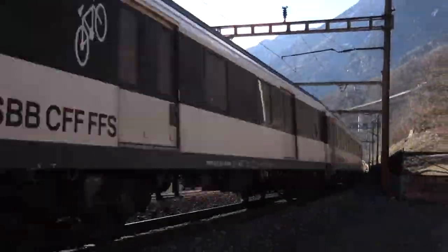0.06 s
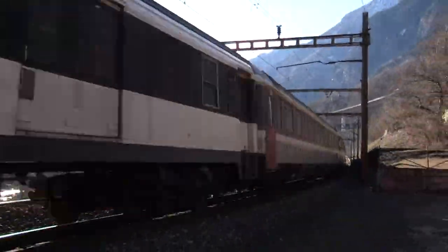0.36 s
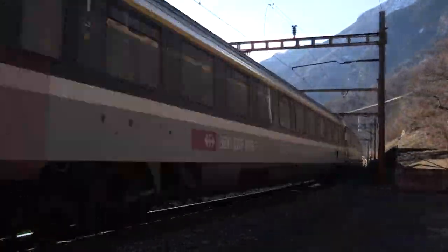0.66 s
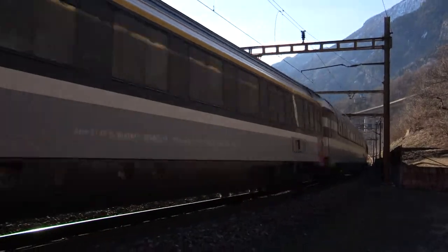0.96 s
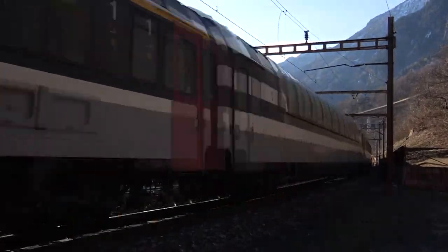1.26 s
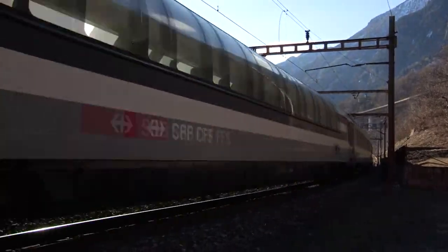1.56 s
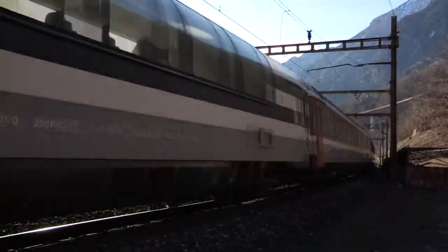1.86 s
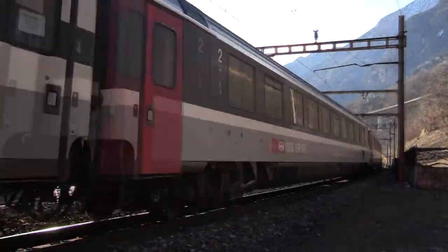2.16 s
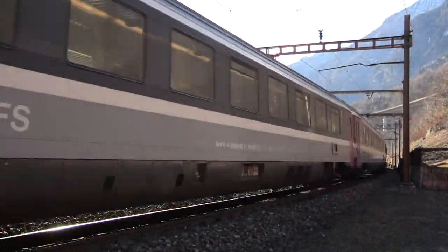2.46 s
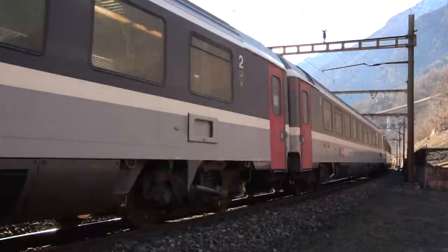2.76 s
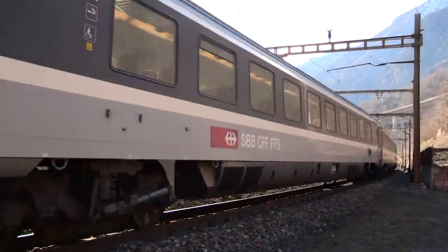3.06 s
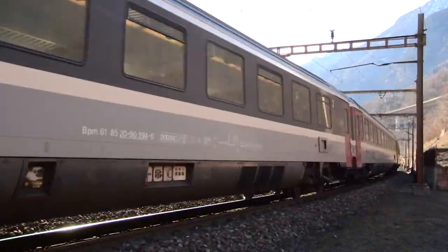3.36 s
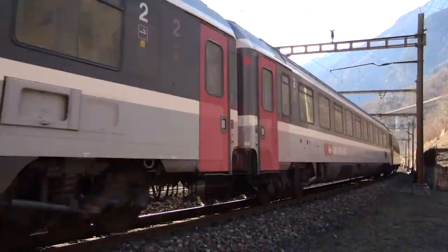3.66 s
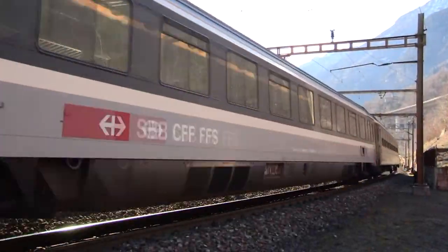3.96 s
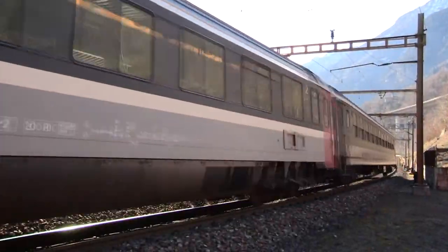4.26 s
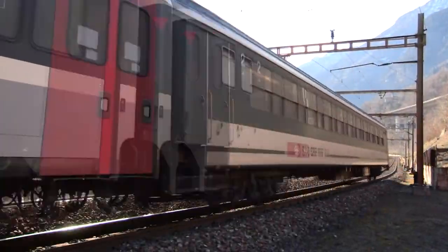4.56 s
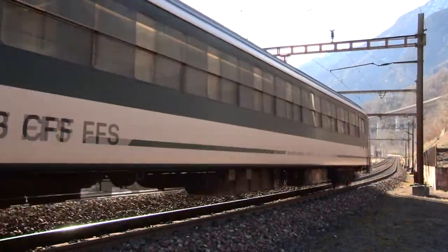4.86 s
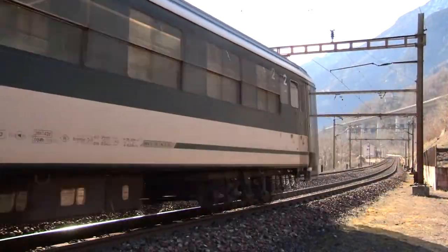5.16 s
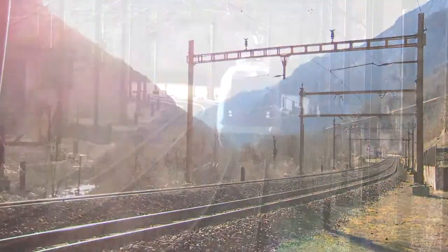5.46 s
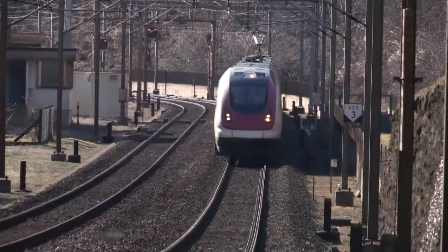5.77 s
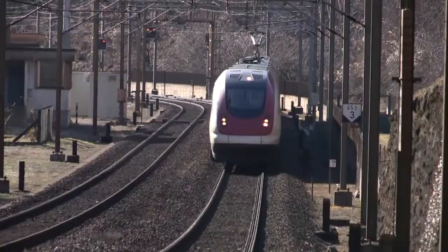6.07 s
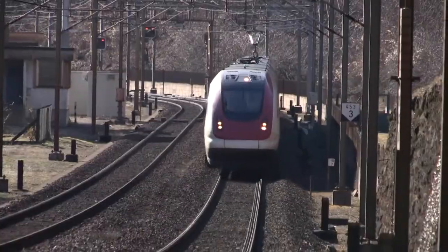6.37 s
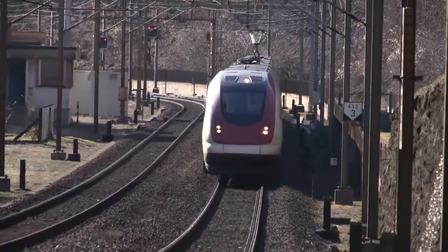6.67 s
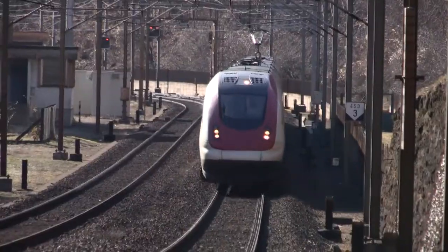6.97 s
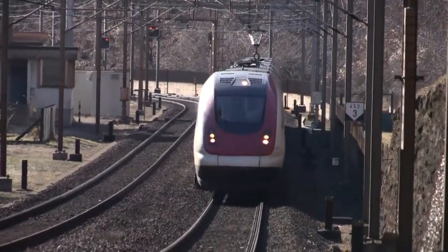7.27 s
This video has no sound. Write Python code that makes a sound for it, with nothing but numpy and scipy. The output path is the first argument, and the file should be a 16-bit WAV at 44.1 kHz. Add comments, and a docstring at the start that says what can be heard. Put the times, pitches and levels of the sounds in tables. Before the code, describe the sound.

An electric passenger train rushes past a few metres from the microphone, loud from the start and stronger on the left. It opens with a low gust and a gear whine that sinks and fades within half a second. Wheels roar by in surges about every 0.8 seconds, with rumbling air, gritty scrapes and brief high squeals gliding slightly down. Rapid metallic knocking comes from about 1.8 to 3 seconds and again from 3.4 to 3.8. A thin rail sizzle runs from 2.2 to 4.4 seconds. From 4.7 the last coach passes with a rough, ringing roar. At 5.5 seconds the sound cuts abruptly to a much quieter outdoor line, where a distant train makes a faint, smooth roar until the end, around 7.5 seconds. Small birds chirp thinly on the left until 6.5, and once more near 7.2. Four tiny dry ticks sound close by around 6 seconds.

```python
"""A gust and a roar of wheels: an electric passenger train rushes by a few metres from a stereo microphone.
A pair of bogies passes about every 0.8 s. Rough wheels shake sleepers and rails, flanges scrape,
wheel discs sing and glide down in pitch, and flat spots knock once a turn.
At 5.5 s comes an abrupt cut to the quiet line: another train far up the track, small birds
off to the left, and a few dry ticks close to the microphone."""
import sys
import numpy as np
from scipy import signal
from scipy.fft import rfft, irfft
from scipy.io import wavfile
from scipy.ndimage import uniform_filter1d

SR = 44100
rng = np.random.default_rng(int(sys.argv[2]) if len(sys.argv) > 2 else 0)


def dump(signal):
    """Clip the signal to [-1, 1] and save it as 16-bit WAV at the path in sys.argv[1]."""
    limited = np.clip(np.atleast_2d(signal).T, -1, 1)
    pcm = np.round(limited * 32767).astype(np.int16)
    wavfile.write(sys.argv[1], SR, pcm)


N = 322812
TIME = np.arange(N) / SR
CUT_S, SPEED_M_PER_S = 5.511, 33
DOPPLER, GLIDE_S = .07, .25  # a passing wheel's pitch swing each way [share], and its time scale

# how alike the microphone's two channels are: (frequency [Hz], coherence [0-1])
COHERENCE = [(25, .5), (60, .72), (130, .92), (300, .94), (1000, .88), (1500, .76), (2500, .5), (6000, .44),
             (9000, .28), (11500, .5), (15000, .2)]
# how far the left channel leads: (frequency [Hz], phase [rad])
LEFT_LEAD = [(100, 0), (200, .2), (500, .5), (800, .8), (3000, 1), (6000, 1.3), (7000, 1.7), (9000, 1),
             (10500, -.2), (15000, .4)]
# balance of the near track and of the distance: (frequency [Hz], left minus right [dB])
NEAR_BALANCE = [(25, 7.3), (60, 5.5), (130, 3.7), (260, 3.4), (550, 4.4), (1100, 6), (2200, 5.5),
                (8000, 4.5), (15000, 4.3)]
FAR_BALANCE = [(100, 2.2), (1000, 2.1), (8000, 2)]

# spectra of the slipstream and of the gust on the microphone: (frequency [Hz], relative level [dB])
AIR_COLOUR = [(20, -27.5), (50, -25), (85, -5), (130, 1), (170, 4), (260, -13)]
GUST_COLOUR = [(20, -16), (45, -12), (72, 3), (105, -4), (160, -23)]
# slipstream rumble at the trackside: (time [s], level [dB])
RUMBLE_LEVEL = [(0, -44), (.12, -44), (.25, -46), (.85, -52), (1.0, -48), (1.4, -53), (1.82, -49),
                (2.08, -38.5), (2.38, -45.5), (2.8, -54.5), (3.5, -55), (3.85, -60), (4.3, -58.5),
                (5.5, -63)]
# bogies, from the locomotive's last one on:
# (time abreast [s], sleepers [dB], rails [dB], wheels [dB], contact hiss [dB], fizz over hiss [dB])
BOGIE_PASSES = [(.02, -25, -14, -19, -29.5, 1), (.17, -48.5, -22.5, -27, -36.5, 4.5),
                (.57, -47, -38, -28, -33.5, -0.5), (.78, -32, -24.5, -28.5, -36, -2.5),
                (1.35, -27, -22, -25.5, -33, 1.5), (1.5, -33.5, -18.5, -26, -35.5, 1.5),
                (2.08, -34.5, -31, -27.5, -34, 3.5), (2.32, -36.5, -25, -25, -35, 5),
                (2.88, -45.5, -30, -28.5, -41.5, 1), (3.11, -39.5, -25.5, -25.5, -30, 3.5),
                (3.78, -36, -28.5, -26, -32.5, 3.5), (3.96, -35.5, -26.5, -29, -37.5, 3.5),
                (4.55, -39, -33, -28, -35.5, 2.5), (4.7, -37, -23, -26.5, -35, -1.5),
                (5.37, -41, -30.5, -29, -34.5, -10)]
# spectra of those five parts of the rolling noise: (frequency [Hz], relative level [dB])
SLEEPER_COLOUR = [(90, -44), (150, -25), (190, -7), (235, 1), (280, 0.5), (340, 2.5), (450, 2), (560, 0),
                  (700, -2.5), (1100, -31)]
RAIL_COLOUR = [(350, -46.5), (550, -12.5), (660, -6), (790, -3.5), (950, 0), (1250, 1.5), (1500, 0.5),
               (1800, -3.5), (2150, -5), (2600, -13), (4000, -36.5)]
WHEEL_COLOUR = [(1500, -44.5), (2250, -3), (2850, -0.5), (3250, -0.5), (3750, 1.5), (4100, 0.5),
                (4450, 0.5), (5000, -1.5), (5900, -2), (6500, -4.5), (7500, -9.5), (10000, -46.5)]
HISS_COLOUR = [(4500, -36.5), (6600, 3.5), (7100, 0.5), (7900, 3.5), (8500, 3), (9400, 2), (10000, -8.5),
               (12000, -37)]
FIZZ_COLOUR = [(8500, -26), (9900, -3), (11200, -1.5), (12000, -1), (13500, -2), (16000, -1.5)]
# gear whine of the receding locomotive: (time [s], level [dB])
GEAR_LEVEL = [(0, -5.5), (.04, -13.5), (.09, -21.5), (.18, -21.5), (.3, -30.5), (.4, -41), (.55, -60)]
# single modes of wheels and track: (time [s], half length [s], frequency [Hz], width [Hz], level [dB])
WHEEL_SQUEALS = [(.04, 0.035, 3070, 300, -21), (.5, 0.08, 4510, 109.7, -31), (.67, 0.075, 4320, 110, -31),
                 (.803, .017, 3750, 90, -28), (.882, 0.011, 3740, 70, -20), (1.26, 0.056, 3820, 110, -32),
                 (1.3, .02, 4600, 150, -27), (1.42, 0.08, 3684, 240, -23), (1.43, .04, 4550, 150, -30),
                 (1.58, 0.056, 4300, 110, -34), (2.02, 0.12, 9400, 330, -38),
                 (2.195, 0.03, 3660, 240, -27.5), (2.285, 0.027, 8840, 130, -28.5),
                 (2.32, 0.087, 5840, 170, -29), (2.34, .07, 13550, 400, -36),
                 (2.905, 0.021, 9400, 170, -25.5), (2.935, 0.041, 3620, 280, -30.5),
                 (3.14, .035, 13500, 200, -30.5), (3.235, 0.018, 11900, 150, -26),
                 (3.43, 0.15, 2350, 502, -37), (3.15, 0.094, 4300, 350, -30.5), (3.72, .04, 2890, 100, -32),
                 (3.97, 0.22, 3740, 200, -37), (3.74, 0.032, 5850, 170, -26.5),
                 (3.73, .022, 15400, 330, -30), (3.735, .02, 7480, 150, -31),
                 (4.31, 0.19, 2284, 300, -35.5), (4.55, 0.085, 9360, 260, -37),
                 (4.55, 0.083, 4400, 260, -36), (5.42, 0.065, 2696, 220, -31)]
TRACK_HUMS = [(.35, 0.21, 289, 35, -38), (.72, 0.23, 1624, 170, -25.5), (.88, 0.057, 687, 150, -25),
              (1.25, 0.15, 310, 45, -32.5), (1.66, 0.074, 301.5, 40, -33.5), (2.0, 0.11, 424, 45, -34),
              (2.15, 0.23, 1408, 110, -33.5), (2.92, 0.27, 1380, 110, -33), (2.33, 0.035, 540, 35, -32),
              (2.37, 0.081, 660, 70, -34), (2.955, 0.033, 658, 90, -28), (3.07, 0.11, 665, 70, -34),
              (4.68, 0.044, 1130, 550, -23.5), (5.35, 0.071, 1350, 420, -25)]
# flanges touching the rail: (start [s], length [s], level [dB])
FLANGE_SCRAPES = [(.04, .05, -29), (.145, .05, -28.5), (.33, 0.069, -32.5), (1.49, 0.11, -33),
                  (2.224, 0.22, -30), (2.78, .17, -28.5), (3.03, 0.14, -29), (3.658, .045, -31),
                  (3.7, .06, -30)]
# older cars with rough treads: (start [s], end [s], rails [dB], wheels [dB], fizz [dB])
ROUGH_PASSES = [(0.285, 0.918, -25, -30, -36), (4.697, 5.598, -26, -34, -36.5)]
# modes of their wheels: (frequency [Hz], width [Hz], level against those wheels [dB])
ROUGH_WHEEL_MODES = [(2370, 730, -4.5), (2864, 360, -8.5), (4250, 230, -19)]
# singing wheels: (time [s], half length [s], level [dB], emphasis before tuning [Hz], tuning [ratio])
SINGING_WHEELS = [(1.5, 0.11, -29, 7500, 0.84), (2.101, 0.044, -28.5, 6800, 1.04),
                  (2.286, .05, -23.5, 8480, .972), (2.392, 0.065, -36, 12000, 1.6),
                  (2.896, .055, -28.5, 9000, 0.9), (3.085, 0.049, -19.5, 9300, 0.99),
                  (3.185, .042, -23.5, 11000, .975), (3.735, .025, -29, 11500, 1.1),
                  (4.522, 0.067, -43, 8500, 0.99), (5.419, .09, -47, 8500, 1.002)]
# high modes of the wheel discs: (frequency before tuning [Hz], width [Hz], relative level [dB])
DISC_MODES = [(4380, 270, -6.5), (5940, 330, 8), (7530, 320, 5.5), (9110, 450, 7), (10760, 420, -0.5),
              (12050, 270, 3.5), (13700, 300, -1.5), (15250, 250, -4.5)]
# flat spots, about 84 ms a turn, and lighter blows: (time [s], thump [dB], clang [dB], crack [dB])
FLAT_SPOT_HITS = [(1.764, -32, -25, -34), (1.8485, -39, -19, -37), (1.931, -35, -16, -29),
                  (2.015, -33.5, -18, -33), (2.099, -28, -21.5, -30), (2.201, -33, -19, -26),
                  (2.282, -35, -20, -34), (2.372, -24, -27, -37), (2.449, -30.5, -22.5, -30),
                  (2.524, -35.5, -27, -30), (2.607, -43, -27, -35), (2.692, -28.5, -24.5, -28),
                  (2.728, -45, -27.5, -44), (2.7765, -23.5, -17.5, -30), (2.86, -28, -24, -27),
                  (2.933, -43, -27, -38), (2.949, -25, -24, -38), (3.414, -41.5, -25, -34),
                  (3.498, -31, -26, -29), (3.5045, -30, -35, -29.5), (3.5825, -23, -17.5, -26.5),
                  (3.666, -31.5, -22, -28), (3.677, -48, -30, -29), (3.751, -34, -40, -30)]
# ring of sleeper (thump), rail (clang), wheel (crack): (frequency [Hz], relative level [dB], t60 [s])
HIT_MODES = {"thump": [(366, -9.5, 0.052), (425, -4.5, 0.033), (650, 0.5, 0.027)],
             "clang": [(750, -4.5, .016), (937, 0, .019), (1050, 2.5, 0.021), (1320, -4, 0.029),
             (1480, -7.5, .014)], "crack": [(1860, -6, 0.022), (2253, 0, .022), (2850, -3.5, .014)]}
# how each of the three sets in: (delay [s], rise [s])
HIT_ONSETS = {"thump": (0.00295, 0.0022), "clang": (0.00032, 0.00095), "crack": (0, 0.00047)}
# the last coach's bogies: (time [s], half length [s], level [dB])
LAST_BOGIES = [(4.768, 0.18, -27.5), (5.328, 0.21, -27.5)]
# bell-like modes of their older wheels: (frequency [Hz], width [Hz], relative level [dB])
BELL_MODES = [(2270, 330, -4.5), (2556, 190, -1.5), (2930, 100, -0.5), (4170, 400, 0), (5280, 200, -8),
              (6400, 280, -5), (7750, 350, -11), (9250, 400, -9.5), (10800, 220, -16)]

# spectra on the quiet line, of far train, low hum and soft hiss: (frequency [Hz], relative level [dB])
FAR_TRAIN_COLOUR = [(25, -46), (60, -28), (95, -29), (122, -12), (160, -20), (250, -8.5), (500, -7.5),
                    (900, -3), (1750, -1), (3000, -9.5), (4800, -15), (6500, -20.5), (8500, -29),
                    (11000, -36), (15500, -41)]
FAR_HUM_COLOUR = [(85, -30), (110, -7), (132, 8), (170, -32)]
SOFT_HISS_COLOUR = [(1500, -18.5), (3500, -4), (6000, 0), (9000, -10), (12500, -12), (16000, -17)]
# birds beside the line: (time [s], note shape, level [dB])
BIRD_CALLS = [(5.525, "high", -60), (5.62, "flick", -55), (5.722, "high", -61), (5.824, "flick", -58),
              (5.888, "arch", -61), (6.018, "slur", -62), (6.12, "arch", -58), (6.16, "high", -76),
              (6.254, "slur", -61), (6.34, "high", -78), (6.358, "arch", -60), (6.545, "high", -80),
              (7.165, "low", -69)]
# note shapes: (length [s], start pitch [Hz], middle pitch [Hz], end pitch [Hz])
NOTE_SHAPES = {"high": (0.0555, 11350, 11300, 11400), "flick": (0.027, 8150, 7450, 5300),
               "arch": (0.05, 7720, 7900, 7650), "slur": (.066, 6400, 5500, 4950),
               "low": (0.054, 6150, 6330, 5800)}
# dry ticks close by: (time [s], level [dB])
CLOSE_TICKS = [(5.928, -56), (5.965, -54), (6.052, -52), (6.244, -52)]


def gain_of(db):
    """Decibels to amplitude."""
    return 10 ** (np.asarray(db) / 20)


def unit_rms(x):
    """Scales to rms 1."""
    return x / np.sqrt(np.mean(x ** 2) + 1e-20)


def at_hz(points, hz):
    """Reads a table on a log-frequency axis."""
    frequency, value = np.transpose(points)
    return np.interp(np.log(hz + 1), np.log(frequency + 1), value)


def over_time(points):
    """Reads a time table at every sample."""
    return np.interp(TIME, *np.transpose(points))


def add(mix, s, sound):
    """Mixes a sound in at time s; what lies outside the mix is dropped."""
    at = round(s * SR)
    sound = sound[..., max(-at, 0):]
    part = mix[..., max(at, 0):][..., :sound.shape[-1]]
    part += sound[..., :part.shape[-1]]


def bell(x, half_width):
    """A Gaussian swell that peaks at x = 0."""
    return np.exp(-.5 * (x / half_width) ** 2)


def gate(start_s, end_s, edge_s):
    """Rises softly at the start, holds, and falls at the end."""
    return 0.26 * (1 + np.tanh((TIME - start_s) / edge_s)) * (1 + np.tanh((end_s - TIME) / edge_s))


def wander(rate_hz):
    """Smooth random drift of rms 1, mostly slower than the rate."""
    hz = np.fft.rfftfreq(N, 1 / SR)
    return unit_rms(irfft(rfft(rng.standard_normal(N)) * np.exp(-(hz / rate_hz) ** 2), N))


def high_pass(x, hz, order):
    """Takes away what lies below hz."""
    return signal.sosfilt(signal.butter(order, hz, "high", fs=SR, output="sos"), x)


def right_channel(left, unrelated, hz):
    """The right channel's spectrum: like the left in the bass, less so in the treble."""
    same = at_hz(COHERENCE, hz)
    return (same * left + np.sqrt(1 - same ** 2) * unrelated) * np.exp(-1j * at_hz(LEFT_LEAD, hz))


def noise(colour, patchy_db, balance=NEAR_BALANCE, size=1024):
    """Coloured stereo noise with drifting patches; the mean of the channels has rms 1."""
    hz, hop = np.fft.rfftfreq(size, 1 / SR), size // 4
    a, b, c, d, patches = rng.standard_normal((5, N // hop + 5, len(hz)))
    patches = unit_rms(uniform_filter1d(uniform_filter1d(patches, size=12, axis=0), size=6, axis=1))
    left = a + 1j * b
    right = right_channel(left, c + 1j * d, hz) * gain_of(-at_hz(balance, hz))
    spectra = np.array([left, right]) * gain_of(at_hz(colour, hz) + patchy_db * patches)
    pair = signal.istft(spectra.swapaxes(1, 2), nperseg=size, noverlap=size - hop)[1][:, :N]
    return pair / pair.mean(0).std()


def at_microphone(pair):
    """Two unrelated versions of a trackside sound become partly alike channels, louder on the left."""
    hz = np.fft.rfftfreq(N, 1 / SR)
    left, unrelated = rfft(pair)
    tilt = gain_of(at_hz(NEAR_BALANCE, hz) / 2)
    return irfft(np.array([left * tilt, right_channel(left, unrelated, hz) / tilt]), N)


def from_track(x):
    """A sound that comes straight from the near track: earlier and louder on the left."""
    hz = np.fft.rfftfreq(N, 1 / SR)
    tilt = gain_of(at_hz(NEAR_BALANCE, hz) / 2) * np.exp(.5j * at_hz(LEFT_LEAD, hz))
    return irfft(rfft(x) * np.array([tilt, 1 / tilt]), N)


def resonance(t, hz, width, doppler):
    """Two unrelated versions of a randomly scrubbed mode; doppler sinks its pitch around t = 0."""
    pole = np.exp(-np.pi * width / SR)
    clock = np.cumsum(1 - doppler * np.tanh(t / GLIDE_S)) / SR
    scrub = rng.standard_normal((2, len(t))) + 1j * rng.standard_normal((2, len(t)))
    envelope = signal.lfilter([1], [1, -2 * pole, pole * pole], scrub)
    return unit_rms((envelope * np.exp(2j * np.pi * hz * clock)).real)


def stirred(hz, width, db):
    """A resonance of steady pitch kept ringing throughout."""
    return gain_of(db) * resonance(TIME, hz, width, doppler=0)


def swells(rows, doppler):
    """Resonances that swell and fade again."""
    out, t = np.zeros((2, N)), np.arange(-SR // 2, SR // 2) / SR
    for s, half_s, hz, width, db in rows:
        swell = bell(t, half_s)
        ring = unit_rms(resonance(t, hz, width, doppler) * swell)
        add(out, s + t[0], gain_of(db) * ring * np.sqrt(np.mean(swell ** 2)))
    return out


def passing(levels_db, ahead_m, behind_m, steepness):
    """Amplitude at the microphone: each bogie swells as it nears and fades as it leaves; powers add."""
    coarse_s = TIME[::100]
    past_m = SPEED_M_PER_S * (coarse_s - np.array(BOGIE_PASSES)[:, :1])
    spread = 1 + (past_m / np.where(past_m < 0, ahead_m, behind_m)) ** 2
    power = (gain_of(levels_db)[:, None] ** 2 / spread ** steepness).sum(0)
    return np.interp(TIME, coarse_s, np.sqrt(power))


def pushed_air(gust_db=-38, fall_db_per_s=110):
    """The slipstream rumbles; the locomotive's deeper gust buffets the microphone and dies quickly."""
    rumble, gust = (noise(colour, patchy_db=1.5, size=2048) for colour in (AIR_COLOUR, GUST_COLOUR))
    return gain_of(over_time(RUMBLE_LEVEL)) * rumble + gain_of(gust_db - fall_db_per_s * TIME) * gust


def rolling(judder_db=1.0, scrape_db=0.07):
    """Roughness shakes sleepers, rails and wheels; the contact force judders in all of them."""
    _, sleeper_db, rail_db, wheel_db, hiss_db, fizz_db = np.transpose(BOGIE_PASSES)
    judder, scrape = judder_db * wander(rate_hz=45), -scrape_db * wander(rate_hz=170)
    sleeper = passing(sleeper_db, ahead_m=2.57, behind_m=5.7, steepness=1.02) * gain_of(judder)
    rail = passing(rail_db, ahead_m=5.53, behind_m=4.42, steepness=1.315) * gain_of(0.72 * judder)
    wheel = passing(wheel_db, ahead_m=5.33, behind_m=6.93, steepness=1.94)
    wheel *= gain_of(0.64 * judder + scrape)
    roar = (sleeper * noise(SLEEPER_COLOUR, patchy_db=1.5)
            + rail * noise(RAIL_COLOUR, patchy_db=1.5)
            + wheel * noise(WHEEL_COLOUR, patchy_db=2.1))
    modes = (sleeper * stirred(hz=293, width=52, db=-13)
             + rail * stirred(hz=1340, width=190, db=-15)
             + wheel * stirred(hz=3720, width=260, db=-11))
    contact = sum(passing(db, ahead_m=4.7, behind_m=5.2, steepness=1.56) * noise(colour, patchy_db=1.6)
                  for db, colour in ((hiss_db, HISS_COLOUR), (hiss_db + fizz_db, FIZZ_COLOUR)))
    return roar + at_microphone(modes) + gain_of(scrape) * contact


def gear_whine(start_hz=791, drop_hz=84.2, drop_s=0.35, waver=0.013, flicker_db=0.93):
    """The locomotive's gear tone, unsteady, sinking and fading as it runs away down the line."""
    hz = start_hz - drop_hz * (1 - np.exp(-TIME / drop_s))
    turns = np.cumsum(hz * (1 + waver * wander(rate_hz=21))) / SR
    level = gain_of(over_time(GEAR_LEVEL) + flicker_db * wander(rate_hz=73))
    return from_track(level * np.sin(2 * np.pi * turns))


def squeals_and_hums(shake_db=0.5):
    """Single wheels squeal and glide down, the track hums at set pitches; the rough rail shakes both."""
    rings = swells(TRACK_HUMS, doppler=0) + swells(WHEEL_SQUEALS, DOPPLER)
    return at_microphone(high_pass(rings, hz=230, order=4) * gain_of(shake_db * wander(rate_hz=32)))


def flange_scrapes(edge_s=0.0056, hiss_db=-4, grit_db=1.7):
    """A flange touches the rail and lets go: a burst of gritty fizz."""
    level = sum(gain_of(db) * gate(s, s + length, edge_s) for s, length, db in FLANGE_SCRAPES)
    fizz, hiss = (noise(colour, patchy_db=1.8) for colour in (FIZZ_COLOUR, HISS_COLOUR))
    return level * gain_of(grit_db * wander(rate_hz=110)) * (fizz + gain_of(hiss_db) * hiss)


def rough_cars(edge_s=0.13, judder_db=0.7):
    """Rough treads send waves far along the rails, so these cars roar with no lull between bogies."""
    rail, wheel, fizz = sum(gain_of(levels_db)[:, None] * gate(start_s, end_s, edge_s)
                            for start_s, end_s, *levels_db in ROUGH_PASSES)
    roar = sum(level * noise(colour, patchy_db=1.6)
               for level, colour in ((rail, RAIL_COLOUR), (wheel, WHEEL_COLOUR), (fizz, FIZZ_COLOUR)))
    rail_ring = rail * stirred(hz=1480, width=190, db=-6.5)
    wheel_ring = wheel * sum(stirred(*mode) for mode in ROUGH_WHEEL_MODES)
    return gain_of(judder_db * wander(rate_hz=45)) * (roar + at_microphone(rail_ring + wheel_ring))


def singing_wheels(reach_octaves=0.5):
    """Wheels scrub through the curve and ring in many disc modes, all gliding down as they go by."""
    out, t = np.zeros((2, N)), np.arange(-SR // 3, SR // 3) / SR
    for s, half_s, db, emphasis_hz, tuning in SINGING_WHEELS:
        ring = 0
        for hz, width, mode_db in DISC_MODES:
            weight = gain_of(mode_db) * bell(np.log2(hz / emphasis_hz), reach_octaves)
            ring += weight * resonance(t, hz * tuning, width, DOPPLER)
        add(out, s + t[0], gain_of(db) * unit_rms(ring) * bell(t, half_s))
    return out * gain_of([[2.5], [-2.5]])  # louder on the left


def struck(t, modes, rise_s, detune=0.037):
    """Sleeper, rail or wheel rings down after a blow, tuned a little differently each time."""
    ring = 0
    for hz, db, t60 in modes:
        hz *= 1 + detune * rng.standard_normal()
        ring += gain_of(db - 60 * t / t60) * np.sin(2 * np.pi * (hz * t + rng.random()))
    return ring * (1 - np.exp(-(t / rise_s) ** 2))


def flat_spots(rattle_db=-30, rattle_s=0.026, rattle_rise_s=0.0036, scatter_db=-5,
               landing_db=-6, landing_s=0.0036, echo_db=-15, echo_s=0.013):
    """A wheel drops onto its flat spot: sleeper, rail and wheel ring, and the bogie rattles."""
    t = np.arange(SR // 8) / SR
    rattle_level = gain_of(rattle_db) * np.exp(-t / rattle_s) * (1 - np.exp(-t / rattle_rise_s))
    direct, scattered = np.zeros(N), np.zeros((2, N))
    for s, *levels_db in FLAT_SPOT_HITS:
        for db, (part, modes) in zip(levels_db, HIT_MODES.items()):
            delay_s, rise_s = HIT_ONSETS[part]
            ring = struck(t, modes, rise_s)
            rattle = rattle_level * rng.standard_normal((3, len(t)))
            shaken = signal.fftconvolve(rattle, ring[None], axes=1)[:, :len(t)]
            blow = ring + shaken[0]
            if part != "thump":  # the wheel lands on the flat's far edge
                add(blow, landing_s * (1 + 0.14 * rng.uniform(-1.0, 1)), gain_of(landing_db) * ring)
            # the coach side throws the blow back
            add(blow, echo_s * (1 + 0.23 * rng.uniform(-1.2, 1)), gain_of(echo_db) * ring)
            force = gain_of(db) / blow[:SR // 100].std()  # the first 10 ms set the level
            add(direct, s + delay_s, force * blow)
            add(scattered, s + delay_s, force * gain_of(scatter_db) * shaken[1:])
    return high_pass(from_track(direct) + at_microphone(scattered), hz=250, order=3)


def rail_sizzle(start_s=2.18, end_s=4.39, edge_s=.08, level_db=-41, hiss_db=-1, flutter_db=1.0):
    """The middle coaches creep sideways in the curve, so the rail keeps up a thin fluttering sizzle."""
    fizz, hiss = (noise(colour, patchy_db=1.8) for colour in (FIZZ_COLOUR, HISS_COLOUR))
    level = gain_of(level_db + flutter_db * wander(rate_hz=12)) * gate(start_s, end_s, edge_s)
    ring = at_microphone(stirred(hz=11780, width=220, db=-4))
    return level * (fizz + gain_of(hiss_db) * hiss + ring)


def old_wheels(doppler=.015, chatter_db=2.5):
    """The last coach's wheels ring in separate metallic bands, swelling as each bogie goes by."""
    level = np.sqrt(sum((gain_of(db) * bell(TIME - s, half_s)) ** 2 for s, half_s, db in LAST_BOGIES))
    t = TIME - np.mean([s for s, _, _ in LAST_BOGIES])
    ring = unit_rms(sum(gain_of(db) * resonance(t, hz, width, doppler) for hz, width, db in BELL_MODES))
    return at_microphone(level * gain_of(chatter_db * wander(rate_hz=21)) * ring)


def far_train(level_db=-51):
    """The smooth roar of a train far up the line."""
    return gain_of(level_db) * noise(FAR_TRAIN_COLOUR, patchy_db=1.5, balance=FAR_BALANCE, size=2048)


def far_hum(level_db=-79, throb_hz=3.34, crest_s=5.95):
    """A faint low hum throbs in the distance."""
    throb = .65 + 0.41 * np.cos(2 * np.pi * throb_hz * (TIME - crest_s))
    return gain_of(level_db) * throb * noise(FAR_HUM_COLOUR, patchy_db=-4, balance=FAR_BALANCE, size=4096)


def thin_ring(decay_s=0.082):
    """A thin ring dies away as the quiet line opens."""
    return np.exp(-abs(TIME - CUT_S) / decay_s) * stirred(hz=3950, width=200, db=-55)


def soft_hiss(trail_db=-57, trail_s=0.042, swell_db=-54, swell_at_s=5.65, half_s=0.05):
    """A soft hiss fades from the cut and swells once more."""
    trail = gain_of(trail_db) * np.exp(-abs(TIME - CUT_S) / trail_s)
    swell = gain_of(swell_db) * bell(TIME - swell_at_s, half_s)
    return (trail + swell) * noise(SOFT_HISS_COLOUR, patchy_db=1.8, balance=FAR_BALANCE)


def birds(echo_db=-5, echo_t60=0.6, waver=0.007):
    """Thin, slightly unsteady whistles off to the left, with an echo from walls and trees."""
    song, tremor = np.zeros(N), wander(rate_hz=184)
    for s, shape, db in BIRD_CALLS:
        length_s, *pitches_hz = NOTE_SHAPES[shape]
        progress = np.linspace(0, 1, round(length_s * SR))
        hz = np.polyval(np.polyfit([0, .5, 1], pitches_hz, 2), progress)
        hz *= 1 + waver * np.roll(tremor, -round(s * SR))[:len(hz)]
        whistle = np.sin(2 * np.pi * np.cumsum(hz) / SR)
        add(song, s, gain_of(db) * signal.windows.tukey(len(hz), .5) * whistle)
    t = np.arange(SR // 2) / SR
    tail = rng.standard_normal((2, len(t))) * gain_of(-60 * t / echo_t60)
    echo = signal.fftconvolve(song[None], tail / np.linalg.norm(tail[0]), axes=1)[:, :N]
    direct = np.array([song, np.roll(song, 1)]) * gain_of([[4], [2]])  # right: a sample later, softer
    return direct + gain_of(echo_db) * echo


def ticks(decay_s=.0025):
    """Tiny bright snaps close to the microphone."""
    out, t = np.zeros((2, N)), np.arange(SR // 40) / SR
    for s, db in CLOSE_TICKS:
        snap = high_pass(rng.standard_normal((2, len(t))), hz=8500, order=2)
        add(out, s, gain_of(db) * snap * np.exp(-t / decay_s))
    return out


def scene(crossfade_s=0.009):
    """The close pass from the trackside, an abrupt cut, then the quiet line."""
    train = (pushed_air() + rolling() + gear_whine() + squeals_and_hums() + flange_scrapes()
             + rough_cars() + singing_wheels() + flat_spots() + rail_sizzle() + old_wheels())
    quiet_line = far_train() + far_hum() + thin_ring() + soft_hiss() + birds() + ticks()
    near = np.clip((CUT_S - TIME) / crossfade_s + .5, 0, 1)
    return near * train + (1 - near) * quiet_line


def record(dry):
    """The microphone signal clips at full scale and loses the treble above 15850 Hz."""
    low_pass = signal.firwin(511, 15850, window=("kaiser", 9), fs=SR)
    return signal.oaconvolve(np.clip(dry, -1, 1), low_pass[None], "same")


dry = scene()
out = record(dry)
dump(out)
```